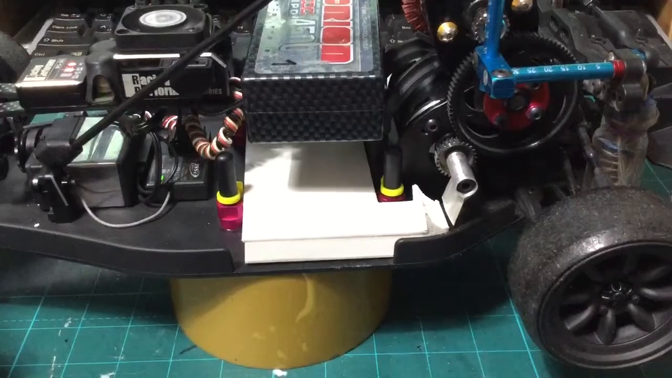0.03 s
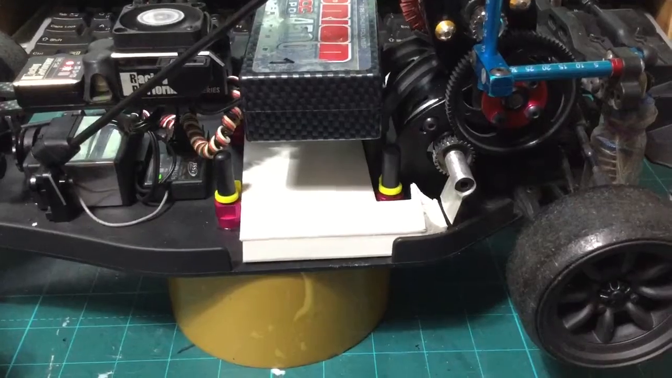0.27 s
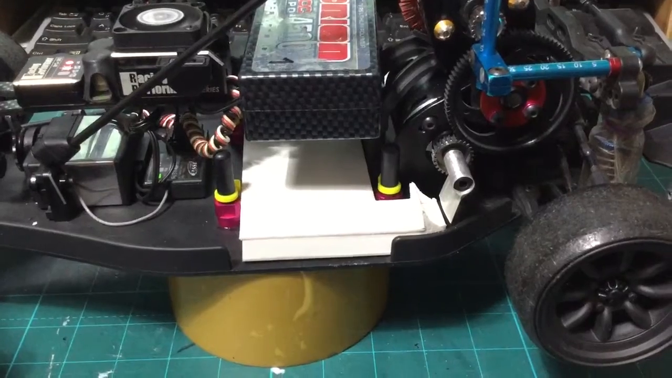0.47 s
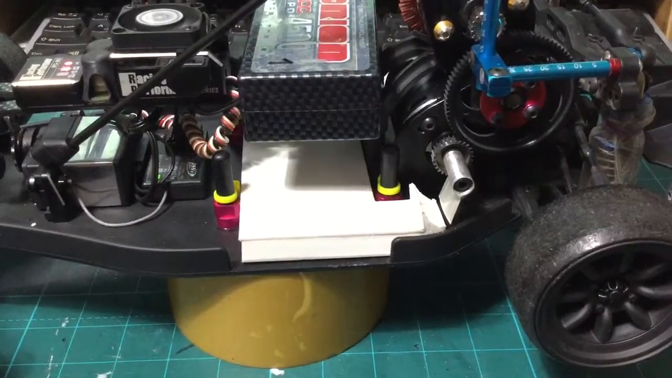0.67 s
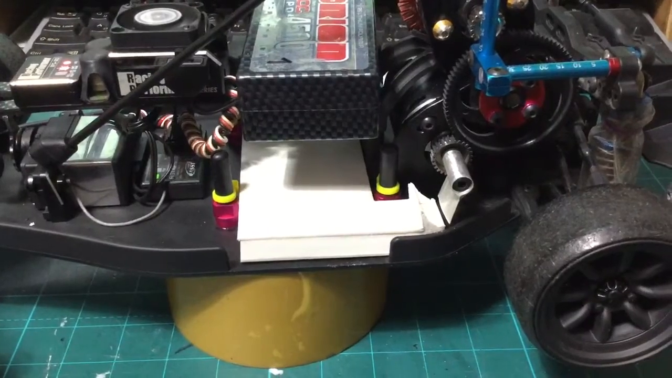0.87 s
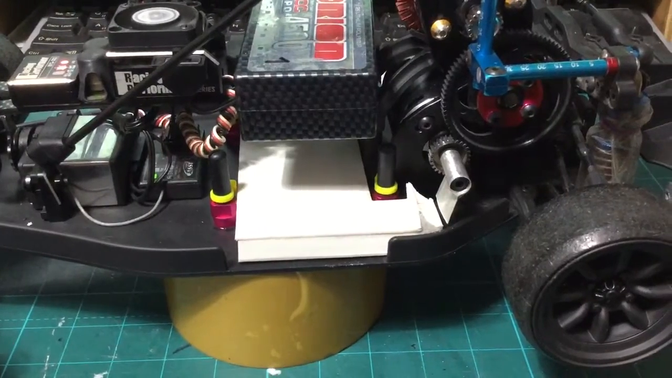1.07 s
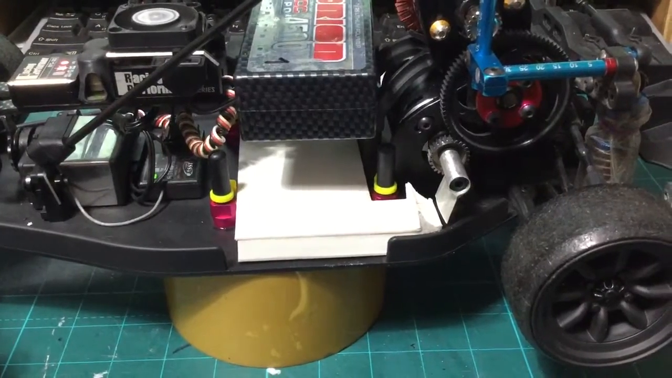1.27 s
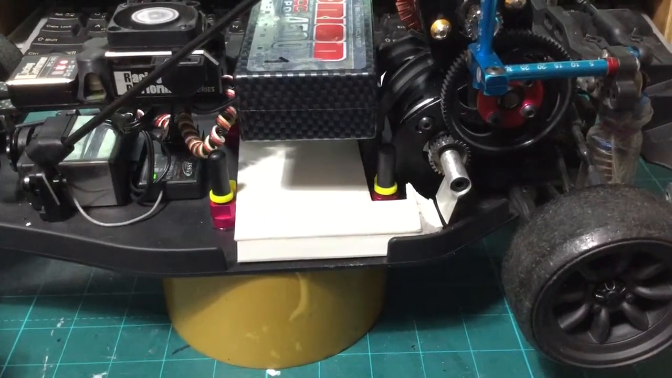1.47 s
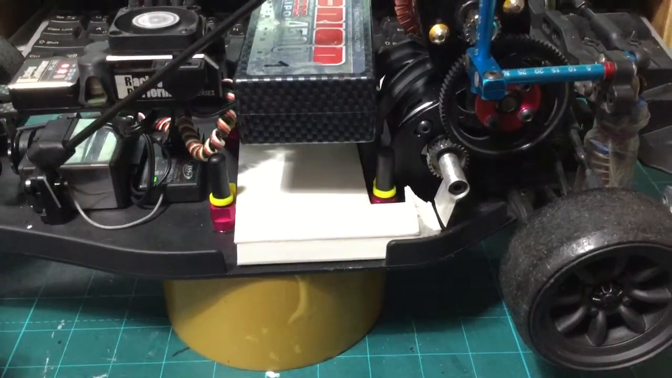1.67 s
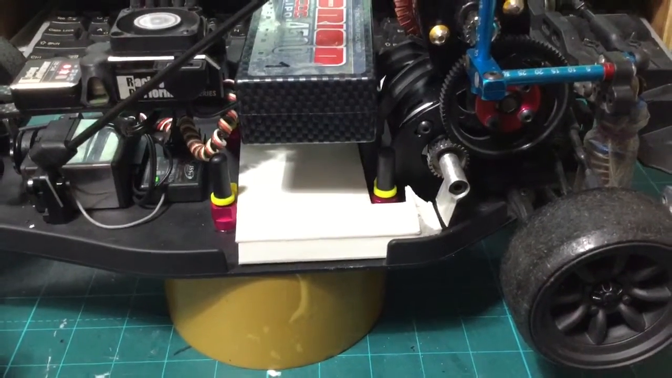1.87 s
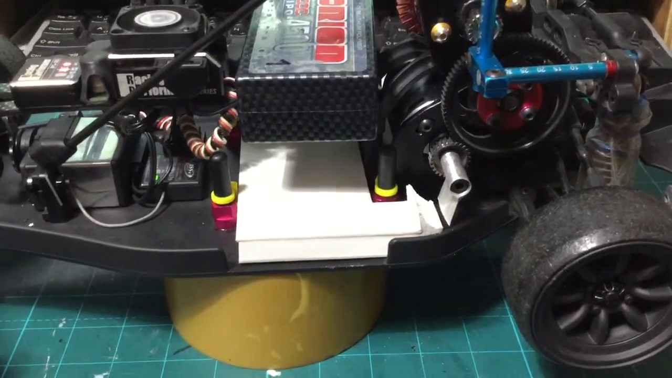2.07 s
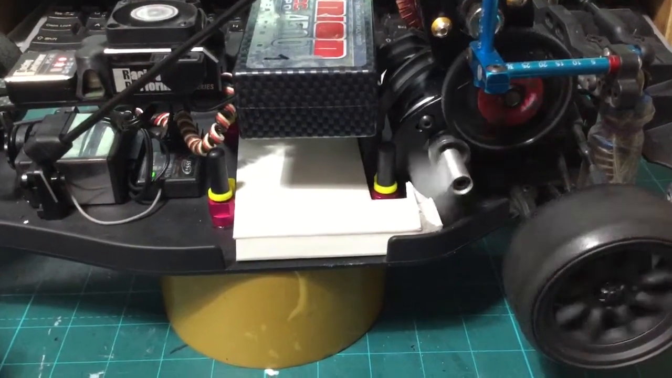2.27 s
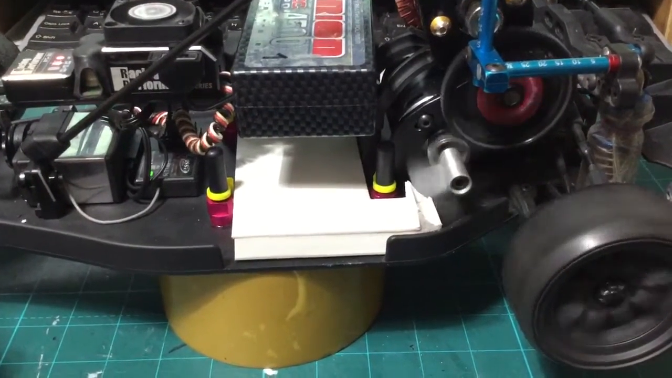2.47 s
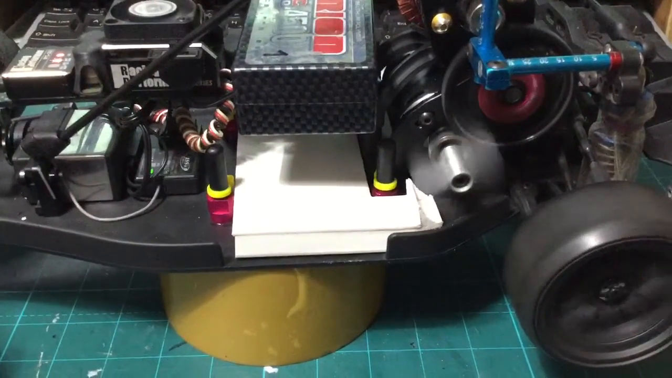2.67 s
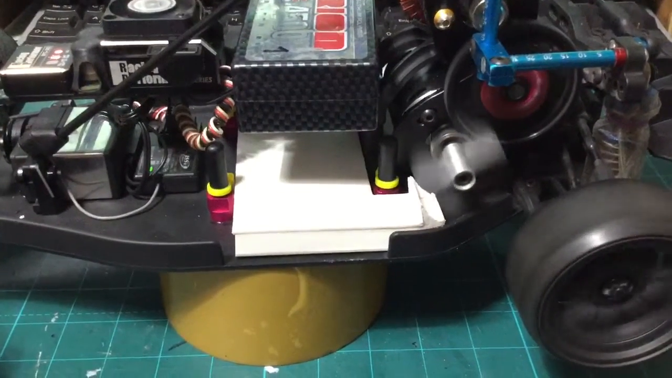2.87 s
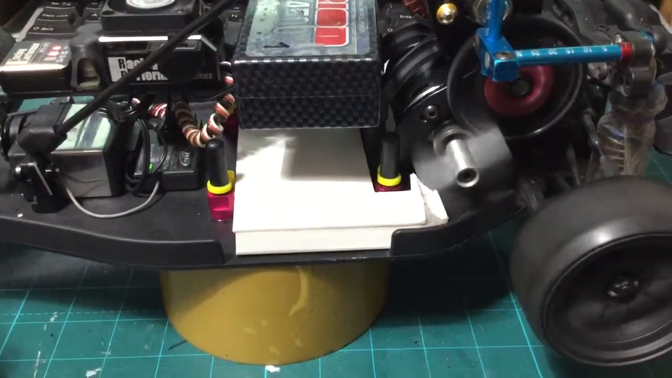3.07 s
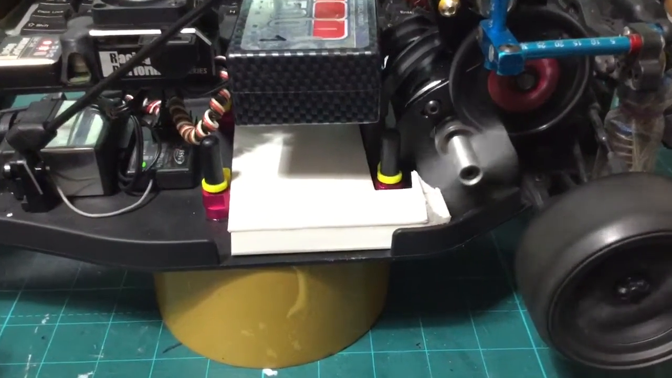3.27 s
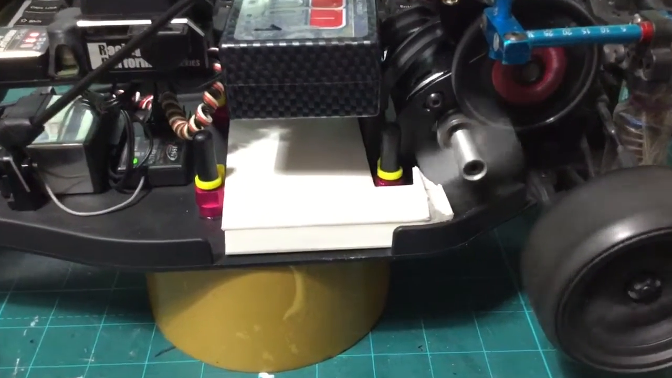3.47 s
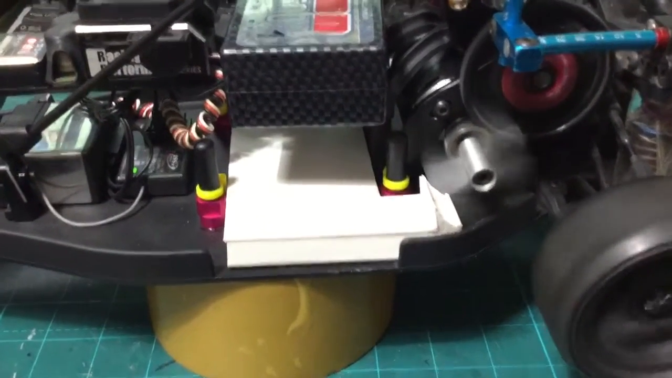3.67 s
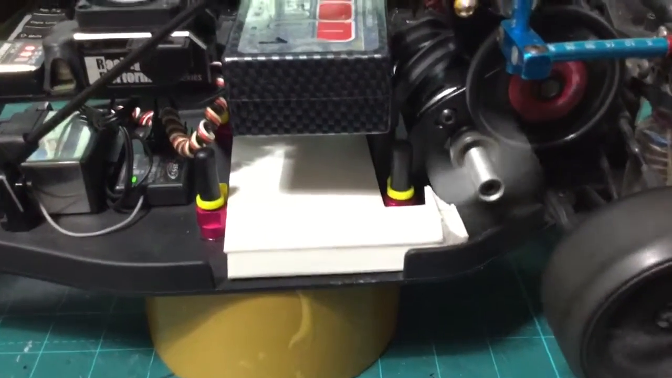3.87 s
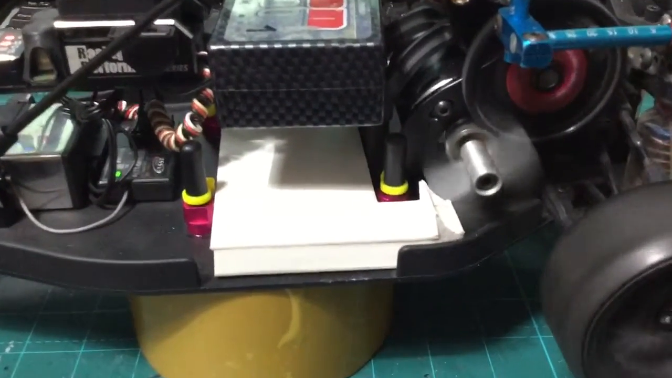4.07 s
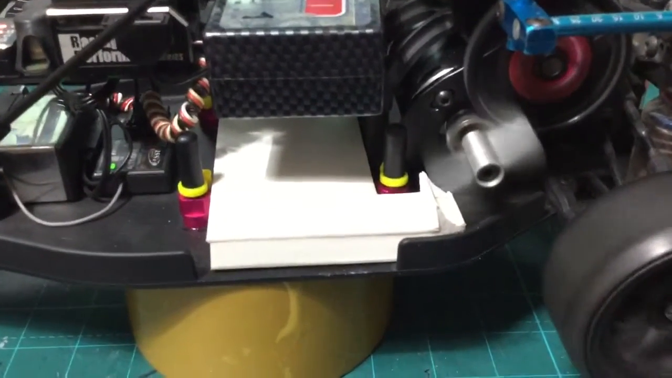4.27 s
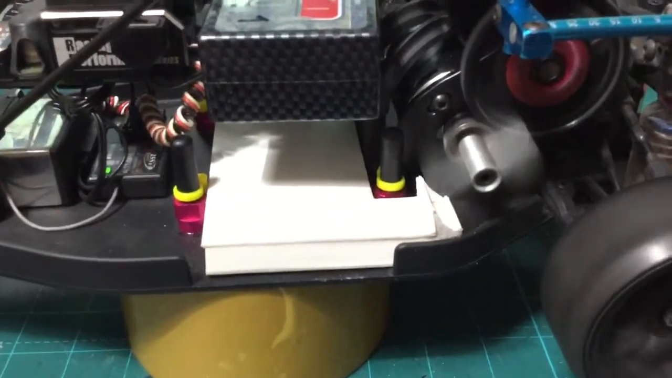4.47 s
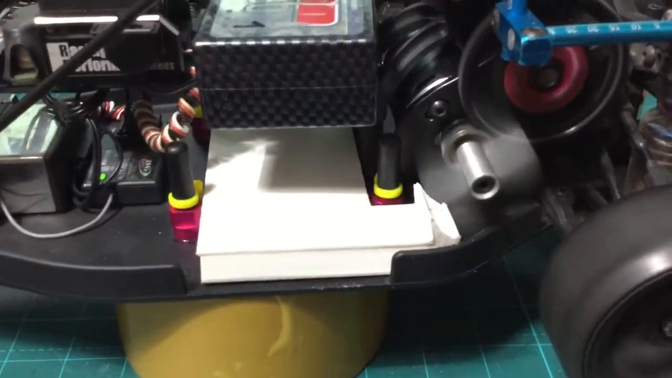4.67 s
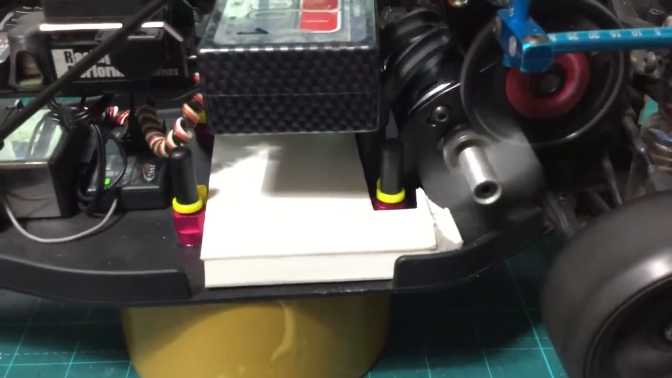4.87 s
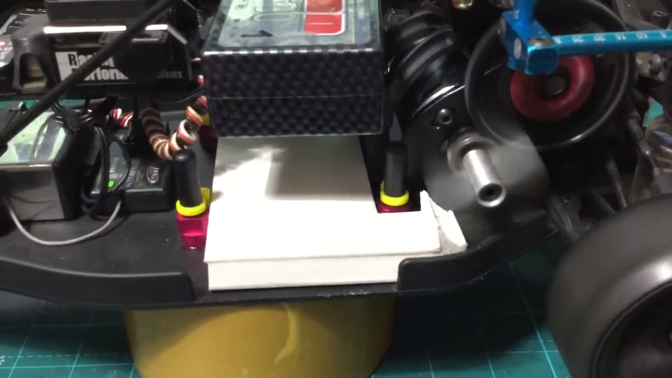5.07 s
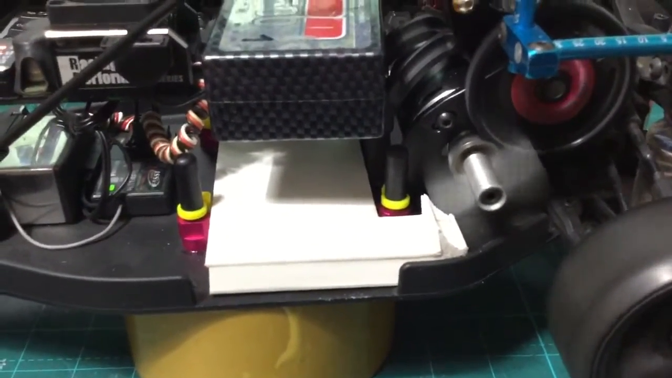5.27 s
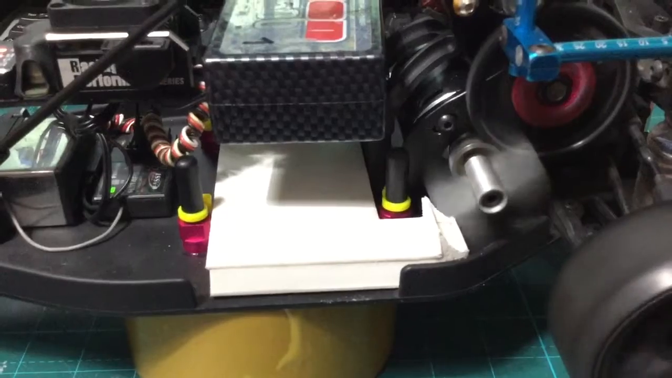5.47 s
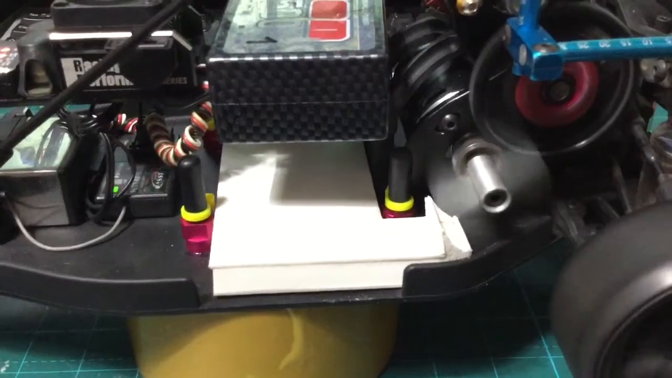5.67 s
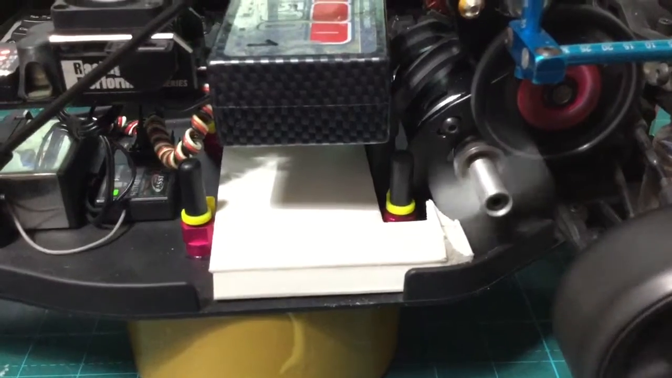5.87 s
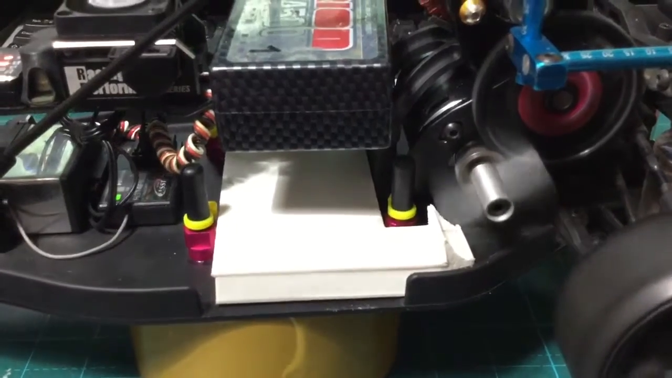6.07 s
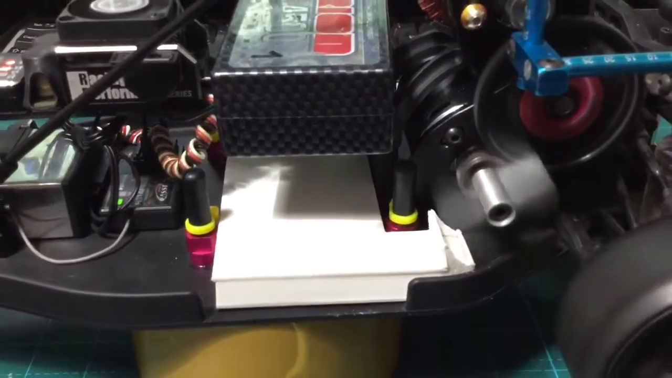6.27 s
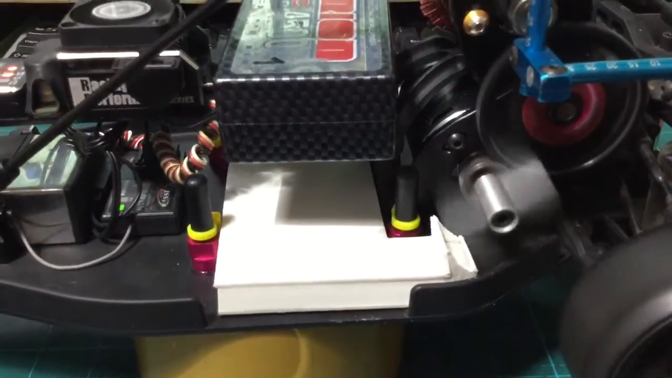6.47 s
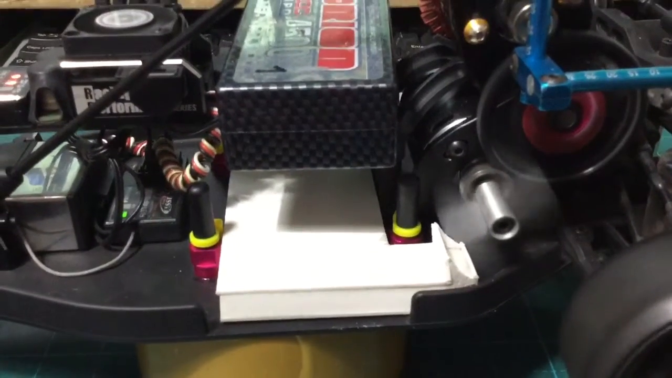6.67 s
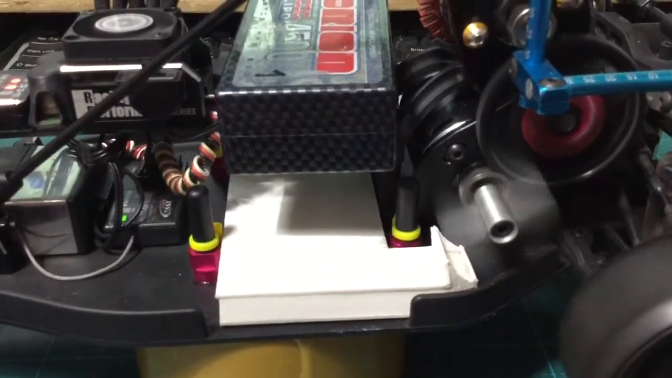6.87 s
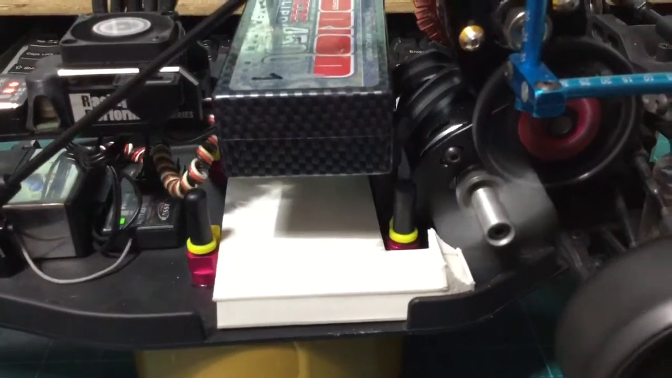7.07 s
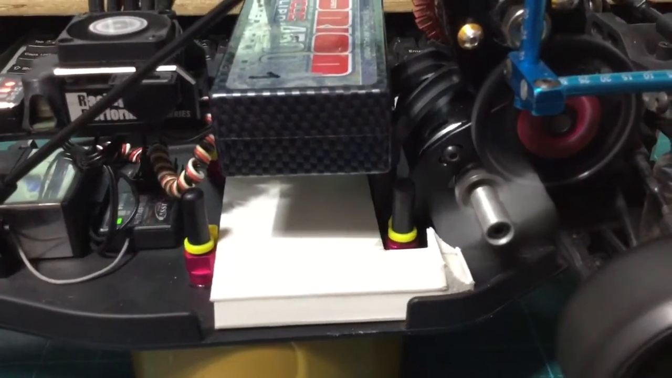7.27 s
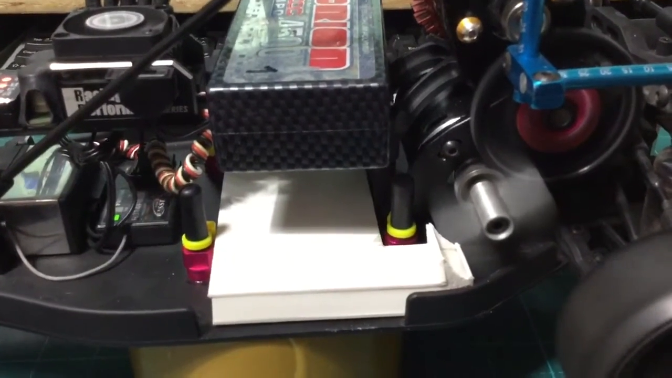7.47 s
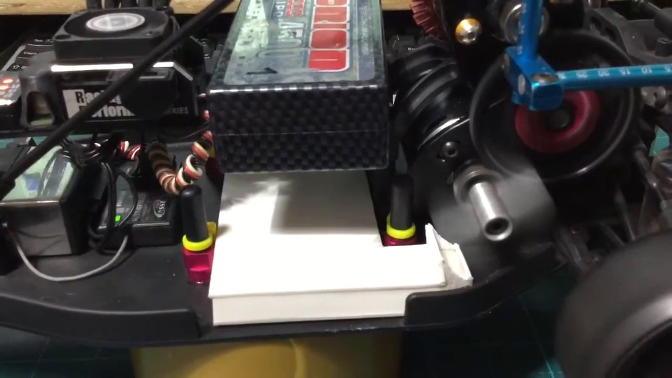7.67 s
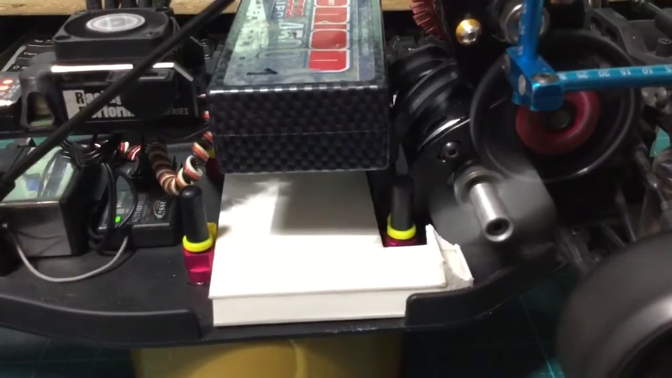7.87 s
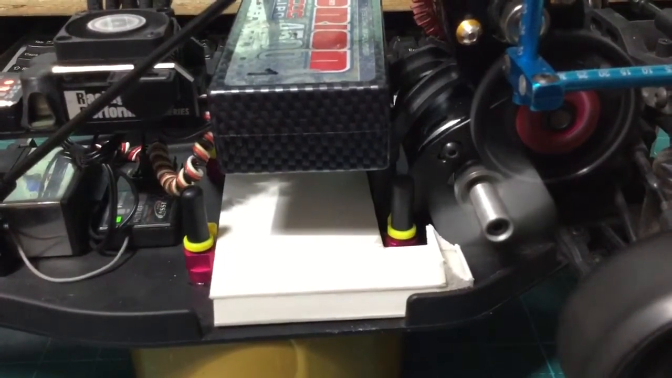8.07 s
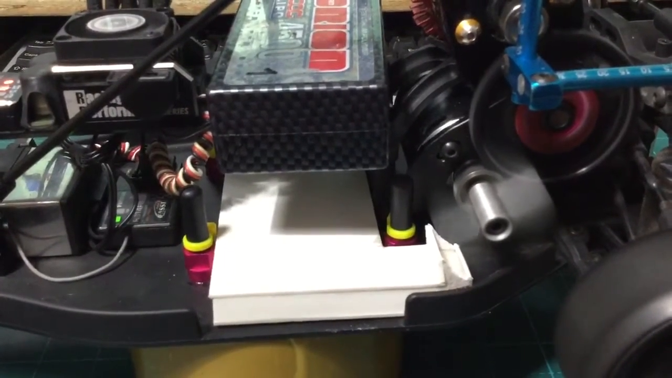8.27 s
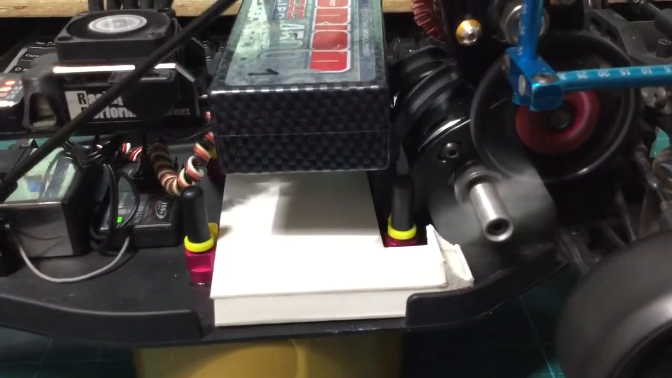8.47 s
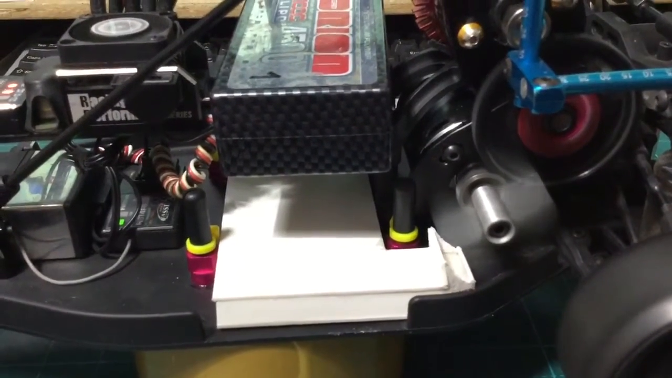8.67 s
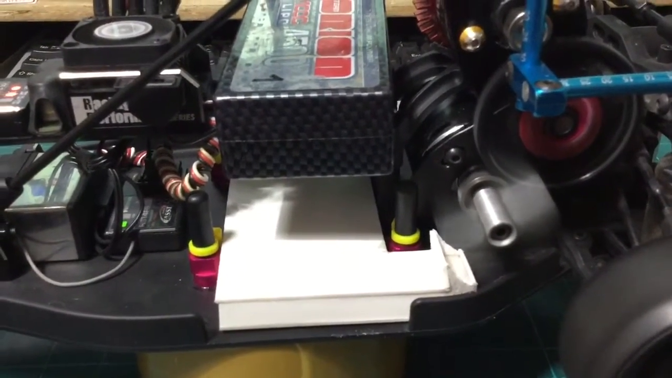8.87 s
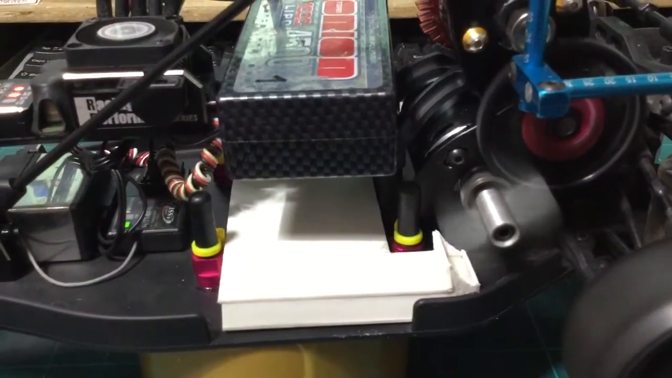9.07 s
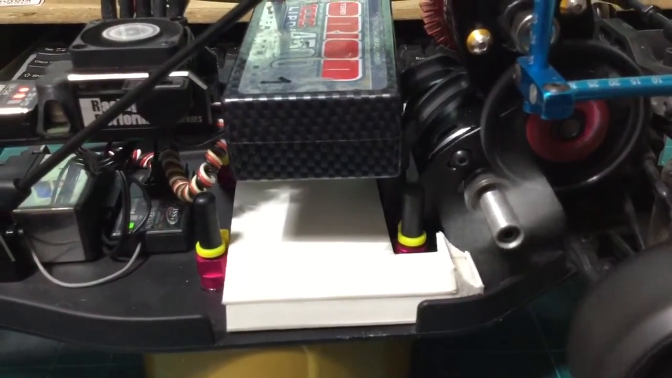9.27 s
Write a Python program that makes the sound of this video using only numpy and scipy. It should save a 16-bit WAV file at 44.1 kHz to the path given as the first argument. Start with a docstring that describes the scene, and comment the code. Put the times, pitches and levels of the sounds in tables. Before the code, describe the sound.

A model car's small electric motor starts with rattling gears, then speeds up in steps to a high, raspy whine.

```python
"""A quiet room, a model car on a stand close to the microphone. Its speed control whistles, the motor
starts and is stepped up to full speed. Rotor and gear teeth sing at multiples of the shaft speed;
loose gears rattle and knock, ringing the chassis, and the stand rumbles. The drive drops at the end.
A small cooling fan and a mains hum run throughout."""
import sys
import numpy as np
from scipy.fft import rfft, irfft, next_fast_len
from scipy.io import wavfile
from scipy.ndimage import uniform_filter1d, map_coordinates

SR = 44100
rng = np.random.default_rng(int(sys.argv[2]) if len(sys.argv) > 2 else 0)


def inscribe(sig):
    """Save sig as 16-bit PCM at rate SR to the path in sys.argv[1].

    A 1-D sig is mono; a 2-D sig holds one channel per row.
    Samples are clipped to [-1, 1] before scaling.
    """
    pcm = np.round(np.clip(np.atleast_2d(sig).T, -1, 1) * 32767)
    wavfile.write(sys.argv[1], SR, pcm.astype(np.int16))


N = 411453

# motor shaft speed: t/s, f/Hz
SHAFT_SPEED = [(2.3, 30), (4.2, 45), (4.4, 62), (4.6, 70.5), (4.75, 80), (4.9, 85.5), (5.2, 88.1),
               (5.42, 107.9), (5.5, 110.8), (5.8, 114.8), (5.95, 123.6), (6.84, 126), (6.96, 141),
               (7.07, 162), (7.23, 163), (7.3, 171), (7.41, 202), (7.48, 205.3), (7.55, 202.5),
               (8.23, 203.4), (8.27, 212), (8.31, 232), (8.35, 239.5), (8.5, 236.6), (8.85, 236.3),
               (9.12, 239.3), (9.2, 238), (9.25, 226), (9.278, 209), (9.33, 170)]
# shaft speed at the four throttle steps: f/Hz
THROTTLE_HZ = [125, 163, 203, 237]
# rotor tones: shaft order, then relative level/dB at each throttle step
ROTOR_ORDERS = [(2, -53, -50, -48, -42), (3, -56, -58, -54, -41), (4, -55, -48, -43, -35),
                (5, -55, -49, -46, -51), (6, -55, -56, -39, -51), (6.5, -58, -52, -41, -41),
                (7, -60, -59, -48, -48), (7.81, -64, -64, -58, -49), (8, -60, -59, -51, -51),
                (9, -62, -55, -53, -54), (11, -55, -55, -53, -47), (12, -64, -55, -44, -60),
                (13, -49, -49, -57, -64), (14, -64, -48, -57, -45), (18, -60, -64, -64, -47)]
# tooth tones: shaft order, then relative level/dB at each throttle step
TOOTH_ORDERS = [(24.7, -66, -64, -47, -62), (26, -51, -46, -39, -32), (27, -66, -64, -49, -39),
                (39, -66, -48, -49, -46), (52, -64, -38, -34, -55), (53, -66, -64, -62, -43),
                (63, -66, -64, -48, -60), (64, -66, -64, -62, -37), (65, -60, -54, -46, -46)]
# tooth rasp: shaft order, relative level/dB, phase spread/rad
RASP_ORDERS = [(26.15, -40, 2.2), (52.04, -31.5, 5.5), (66.3, -35.5, 6.1), (77.6, -31.5, 5.5)]
# shaft speed grid: f/Hz
GRID_HZ = [30, 45, 62, 80, 88, 97, 110, 125, 163, 185, 203, 237]
# per grid speed: level/dB
UNBALANCE_LEVEL_DB = [-95, -78, -62, -56, -49.5, -49.5, -43, -41.3, -38, -35.5, -31, -29.5]
SECOND_SHAFT_DB = [-97, -81, -63, -56, -52, -68, -66, -66, -60, -60, -62, -54]
RATTLE_BODY_DB = [-39.5, -36, -33, -31.5, -31.5, -31.2, -31, -31, -30, -27.5, -28.7, -28.5]
RATTLE_TREBLE_DB = [-40, -34, -29, -25.7, -26.5, -23.5, -25.5, -24.5, -23, -21, -21.5, -20.5]
STAND_DB = [-95, -80, -68, -66, -63, -68, -57, -59, -72, -70, -73, -67]
# per grid speed: gain/dB
ROTOR_GAIN_DB = [-42, -25, -28, -21, -11.5, -7, -4.5, -1.6, -0.7, 1.8, -0.75, -0.1]
TOOTH_GAIN_DB = [-42, -14, -7, 2, 8, 14, 9, -2, 5.5, -5, 2.5, 1.3]
RASP_GAIN_DB = [-40, -16, -11, -10.1, -7, -7, -5.5, -5, -5, 10.5, 1, 0.1]
RATTLE_BASS_GAIN_DB = [0.1, -0.8, -1, -2, -2.5, -3.5, -1.5, -2, -1, 2, 0.5, 1.6]
# rattle colour of slow gears: f/Hz, gain/dB
SLOW_GEAR_EQ = [(150, -8.5), (300, -4.5), (600, 3.5), (1000, -1), (1250, -1), (1550, 5), (1900, 2),
                (2500, -0.5), (4000, -4.5), (6000, 3), (8500, -3), (9300, 0), (10500, -1.5), (13000, -5.5),
                (15700, -7)]
# loud gear knocks: t/s, excitation level/dB
GEAR_KNOCKS = [(2.5273, -29), (2.5548, -23), (2.67, -23), (2.695, -22), (2.7548, -23), (2.8336, -19),
               (2.9738, -20), (2.9954, -18), (3.0791, -18), (3.2133, -24), (3.294, -27), (3.4286, -19),
               (3.529, -17), (3.6944, -24), (3.7278, -13.5), (3.8234, -25), (3.862, -18), (3.9521, -27),
               (4.0119, -17), (4.0846, -17), (4.219, -14), (4.3287, -13.5), (4.4789, -19), (4.559, -13),
               (4.5871, -11), (4.747, -19), (4.843, -14), (5.082, -9.5), (5.27, -16)]
# drive taking up and letting go: t/s, excitation level/dB
DRIVE_CLUNKS = [(2.3503, -32), (9.277, -14)]
# chassis resonances: f/Hz, width/Hz, level/dB
CHASSIS_MODES = [(586, 433, -13), (742, 120, -11.5), (1035, 50, -4.5), (1219, 52, -1), (1338, 22, 4.5),
                 (1427, 20.4, 2.5), (1514, 15, -0.5), (1621, 13.3, -0.5), (2228, 303, -5.5),
                 (2470, 140, -1), (2929, 29, 1), (3305, 317, -1.5), (3907, 334, 0.5), (4460, 110, -1.5),
                 (5100, 69, -4), (6210, 86, -0.5), (7050, 270, -5.5), (8230, 450, -5), (8975, 610, -1),
                 (9410, 466, -2), (10900, 250, -6.5), (13200, 600, -3.5), (14200, 690, -7),
                 (14800, 560, -2.5)]
# chassis response between resonances: f/Hz, level/dB
CHASSIS_FLOOR = [(30, -75), (70, -29.5), (150, -10.5), (300, -13.5), (500, -17.5), (900, -34), (1800, -10),
                 (2700, -11.5), (5000, -3), (7700, -14.5), (11500, -12.5), (15700, -8)]
# mains and fan tones: f/Hz, level/dB
HUM_TONES = [(120, -58.5), (174, -79), (217, -78.5), (434.5, -69.5), (651, -78), (1086, -75.5),
             (1255, -74.5), (1440, -83), (1519, -73.5), (1831, -85), (4340, -89), (4651, -75), (5367, -81)]
# fan rush and room air: f/Hz, relative level/dB
AIR_SPECTRUM = [(20, -25), (35, -15), (55, -8), (90, 5), (200, -1), (320, -11.5), (520, -12.5), (900, -12),
                (1300, -6.5), (1900, -8), (2400, -12), (3300, -10.5), (4300, 0.5), (6300, -9), (8500, -7.5),
                (11000, -20), (15700, -23)]
# faint ticks: t/s, relative level/dB
FAINT_TICKS = [(0.1494, -53), (1.5194, -47), (1.7963, -41)]

SECOND_SHAFT_RATIO = 1.31  # turns per motor turn
START_S, RISE_S, CUT_S = 2.33, .11, 9.283
BAND_LIMIT_HZ = 15830


def motor_shaft():
    """Speed and angle of the shaft."""
    shaft_hz = np.interp(np.arange(N) / SR, *np.transpose(SHAFT_SPEED))
    return shaft_hz, 2 * np.pi * np.cumsum(shaft_hz) / SR


def drive_envelope():
    """Swell and brief surge at the start, quick fall at the end."""
    t = np.arange(N) / SR
    swell = np.clip((t - START_S) / RISE_S, 0, 1) ** 1.4
    surge_db = 3 * np.exp(-np.clip(t - START_S - RISE_S, 0, None) / .027)
    cut_db = 8 * (1 - np.exp(-np.clip(t - CUT_S, 0, None) / .03))
    return swell * amp(surge_db - cut_db)


def drive_tones(shaft_hz, angle_rad):
    """Unbalance, second shaft, rotor and teeth sing at shaft orders; rasp excites the chassis."""
    def tone(order, jitter_rad):
        return np.sqrt(2) * np.sin(order * angle_rad + jitter_rad) * (order * shaft_hz < BAND_LIMIT_HZ)

    def throttle(db):
        return amp(np.interp(shaft_hz, THROTTLE_HZ, db))

    rotor = sum(throttle(db) * amp(1.5 * wobble(12)) * tone(order, .35 * wobble(25))
                for order, *db in ROTOR_ORDERS)
    teeth = sum(throttle(db) * amp(2.5 * wobble(70) + 2.5 * wobble(7)) * tone(order, .72 * wobble(80))
                for order, *db in TOOTH_ORDERS)
    rasp = sum(amp(db + 3.6 * wobble(150)) * tone(order, spread_rad * wobble(220))
               for order, db, spread_rad in RASP_ORDERS)
    unbalance = amp(at_speed(shaft_hz, UNBALANCE_LEVEL_DB) + .8 * wobble(15)) * tone(1, .12 * wobble(20))
    second_shaft = amp(at_speed(shaft_hz, SECOND_SHAFT_DB) + wobble(8.4))
    second_shaft *= tone(2 * SECOND_SHAFT_RATIO, .17 * wobble(25))
    rotor *= amp(at_speed(shaft_hz, ROTOR_GAIN_DB))
    teeth *= amp(at_speed(shaft_hz, TOOTH_GAIN_DB))
    rasp = filtered(amp(at_speed(shaft_hz, RASP_GAIN_DB)) * rasp, chassis)
    accel_hz_per_s = uniform_filter1d(np.gradient(shaft_hz) * SR, size=1500)
    coast = amp(.03 * np.minimum(accel_hz_per_s, 0))  # teeth fade while the shaft slows
    return unbalance + second_shaft + rotor + coast * (teeth + rasp)


def gear_rattle(shaft_hz, angle_rad, drive):
    """Teeth chatter in their play; the treble throbs with both shafts. Slow gears run unevenly."""
    def lows(hz):
        return lowpass(hz, 5000)

    def highs(hz):
        return 1 - lows(hz)

    body_db, treble_db = at_speed(shaft_hz, RATTLE_BODY_DB), at_speed(shaft_hz, RATTLE_TREBLE_DB)
    throb = 1 + .24 * np.sin(angle_rad + .5 * wobble(8))
    throb += .14 * np.sin(SECOND_SHAFT_RATIO * angle_rad + wobble(8))
    slowness = np.clip((110 - shaft_hz) / 70, 0, 1)
    uneven = .48 + .44 * slowness
    flutter = wobble(40) + wobble(130)
    low = amp(uneven * (1.05 * flutter + .36 * wobble(60))) * chatter(shaft_hz, grit=.57)
    high = throb * amp(uneven * (.82 * flutter + .46 * wobble(200))) * chatter(shaft_hz, grit=.55)
    ringing = pings(rate_hz=480, t60_s=.093)
    ringing *= np.interp(shaft_hz, [40, 130, 200], [1.3, 1.05, .6])  # fast gears drown single blows
    body = unit(filtered(low, lambda hz: chassis(hz) * lows(hz))) + .48 * unit(filtered(ringing, lows))
    treble = unit(filtered(high, lambda hz: chassis(hz) * highs(hz)))
    treble += .34 * unit(filtered(ringing, highs))
    gears = drive * (amp(body_db) * unit(body) + amp(treble_db) * unit(treble))
    bass = filtered(gears, lambda hz: lowpass(hz, 950))
    gears += (amp(at_speed(shaft_hz, RATTLE_BASS_GAIN_DB)) - 1) * bass
    gears += knocks(treble_db)
    return (1 - slowness) * gears + slowness * filtered(gears, lambda hz: spectrum(SLOW_GEAR_EQ, hz))


def chatter(shaft_hz, grit):
    """Tiny blows over a rush; faster gears strike more often."""
    chance = (800 + 16 * shaft_hz) / SR
    blows = (rng.random(N) < chance) * rng.standard_normal(N) / np.sqrt(chance)
    blows *= amp(np.clip(3 * rng.standard_normal(N), -6, 3))
    return grit * blows + np.sqrt(1 - grit ** 2) * rng.standard_normal(N)


def pings(rate_hz, t60_s):
    """Single tooth blows, each ringing one chassis mode."""
    pick, detune, force, onset = rng.random((int(rate_hz * N / SR), 4)).T
    t = np.arange(1100) / SR
    hz, width_hz, db = np.array(CHASSIS_MODES)[(pick * len(CHASSIS_MODES)).astype(int)].T
    hz = hz + .6 * width_hz * (2 * detune - 1)
    strength = amp(db + 10 * np.log10(width_hz) - 3.2 * np.log(force + .08))
    envelope = amp(-60 * t / t60_s) * (1 - np.exp(-t / .00052))
    rings = strength[:, None] * np.sin(2 * np.pi * hz[:, None] * t) * envelope
    samples = (onset * N).astype(int)[:, None] + np.arange(len(t))
    return np.bincount(samples.ravel(), rings.ravel(), N + len(t))[:N]


def knocks(treble_db):
    """Short bursts of gear contacts into the chassis; the low band rings longer."""
    soft_rate_hz, soft_end_s = 32, 5.4
    gaps, softness = rng.random((160, 2)).T
    times_s = START_S + RISE_S + np.cumsum(-np.log(gaps + 1e-3)) / soft_rate_hz
    soft_knocks = [(s, treble_db[round(s * SR)] + 14 - 9 * soft)
                   for s, soft in zip(times_s, softness) if s < soft_end_s]
    high, low = np.zeros(N + SR), np.zeros(N + SR)
    for onset_s, db in GEAR_KNOCKS + soft_knocks:
        add_burst(high, onset_s, db, t60_s=.025)
        add_burst(low, onset_s, db - 12, t60_s=.047)
    for onset_s, db in DRIVE_CLUNKS:
        add_burst(low, onset_s, db, t60_s=.07)
    upper = filtered(high[:N], lambda hz: chassis(hz) * (hz > 3000))
    lower = filtered(low[:N], lambda hz: chassis(hz) * (hz < 3000))
    return amp(-1.5) * upper + amp(4) * lower


def chassis(hz):
    """Resonances on a broad floor; the small frame radiates little bass."""
    power = sum(amp(2 * db) / (1 + ((hz - mode_hz) / (width_hz / 2)) ** 2)
                for mode_hz, width_hz, db in CHASSIS_MODES)
    return minimum_phase(np.sqrt(power * highpass(hz, 450, 6) + spectrum(CHASSIS_FLOOR, hz) ** 2))


def stand_rumble(shaft_hz):
    """Lumpy rumble, strongest where the speed suits the stand."""
    shape_hz_db = [(15, -36), (30, -18), (55, 9), (90, 8), (150, -9), (250, -40)]
    rumble = filtered(rng.standard_normal(N), lambda hz: spectrum(shape_hz_db, hz))
    return amp(at_speed(shaft_hz, STAND_DB) + 3.3 * wobble(5)) * unit(rumble)


def speed_control():
    """High whistle: a blip, then a held tone that smears once the motor turns."""
    t = np.arange(N) / SR
    whistle_hz, edge_s = 12120, .027
    gate = sum(np.clip(np.minimum(t - on_s, off_s - t) / edge_s + 1, 0, 1) ** 2
               for on_s, off_s in [(1.82, 1.876), (2.0, 4.3)])
    smear_rad = (t > START_S) * 1.2 * wobble(210)
    whistle = np.sqrt(2) * np.sin(2 * np.pi * whistle_hz * t + smear_rad)
    return gate * amp(-59 + 1.2 * wobble(6.1)) * whistle


def room():
    """Mains hum and fan tones over a soft rush of air; a few faint ticks."""
    t = np.arange(N) / SR
    hum = sum(amp(db + 1.1 * wobble(6)) * np.sqrt(2) * np.sin(2 * np.pi * hz * t + hz / 2500 * wobble(10))
              for hz, db in HUM_TONES)
    rush = filtered(amp(.91 * wobble(25.14)) * rng.standard_normal(N),
                    lambda hz: spectrum(AIR_SPECTRUM, hz))
    ticks = np.zeros(N)
    for onset_s, db in FAINT_TICKS:
        add_burst(ticks, onset_s, db - 4, t60_s=.012, samples=300)
    return hum + amp(-54.5) * unit(rush) + filtered(ticks, lambda hz: highpass(hz, 7000, 4))


def add_burst(track, onset_s, db, t60_s, samples=1300):
    """Add decaying noise in place."""
    t = np.arange(samples) / SR
    track[round(onset_s * SR):][:samples] += amp(db - 60 * t / t60_s) * rng.standard_normal(samples)


def amp(db):
    """dB to gain."""
    return 10 ** (np.asarray(db) / 20)


def unit(x):
    """x at rms 1."""
    return x / np.sqrt(np.mean(x ** 2) + 1e-20)


def at_speed(shaft_hz, db):
    """Level/dB, interpolated on the speed grid."""
    return np.interp(shaft_hz, GRID_HZ, db)


def wobble(rate_hz):
    """Smooth random curve, knots at rate_hz."""
    knots = rng.standard_normal(int(N * rate_hz / SR) + 4)
    return map_coordinates(knots, [np.arange(N) * rate_hz / SR])


def spectrum(points, hz):
    """Gain from (f/Hz, level/dB) points, log frequency axis."""
    points_hz, db = np.transpose(points)
    return amp(np.interp(np.log(hz + 1), np.log(points_hz + 1), db))


def lowpass(hz, corner_hz):
    return 1 / (1 + (hz / corner_hz) ** 8)


def highpass(hz, corner_hz, order):
    return 1 / (1 + (corner_hz / (hz + 1)) ** order)


def filtered(x, response):
    """x through a complex frequency response."""
    size = 2 * next_fast_len(N // 2 + 8192)
    return irfft(rfft(x, size) * response(np.fft.rfftfreq(size, 1 / SR)), size)[..., :N]


def minimum_phase(gain):
    """Same gains, ringing only after the blow."""
    cepstrum = irfft(np.log(gain + 1e-6))
    half = len(cepstrum) // 2
    return np.exp(rfft(np.r_[cepstrum[0], 2 * cepstrum[1:half], cepstrum[half], np.zeros(half - 1)]))


def scene():
    """All sources, mono."""
    shaft_hz, angle_rad = motor_shaft()
    drive = drive_envelope()
    car = drive * (drive_tones(shaft_hz, angle_rad) + stand_rumble(shaft_hz))
    car += gear_rattle(shaft_hz, angle_rad, drive)
    return (car + speed_control() + room())[None]


def record(dry):
    """The loudest rattle peaks are gently rounded off; steep treble cut at the band limit."""
    ceiling = .6
    soft = dry / (1 + np.abs(dry / ceiling) ** 4) ** (1 / 4)
    return filtered(soft, lambda hz: np.clip((BAND_LIMIT_HZ - hz) / 160, 0, 1) ** 2)


dry = scene()
out = record(dry)
inscribe(out)
```